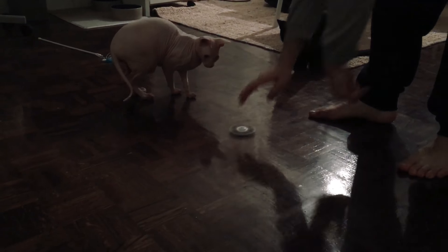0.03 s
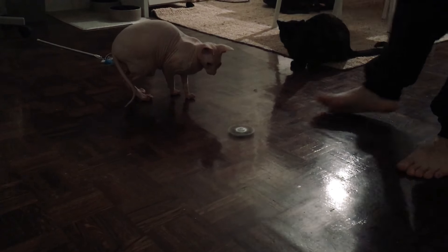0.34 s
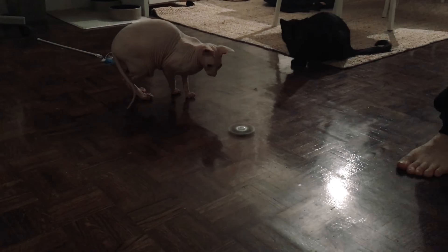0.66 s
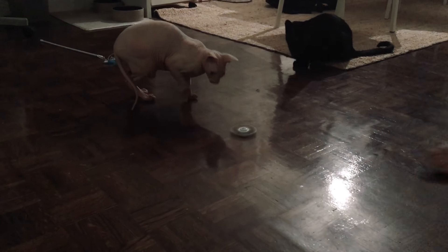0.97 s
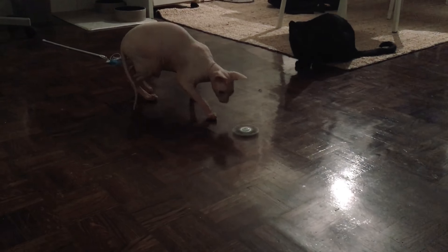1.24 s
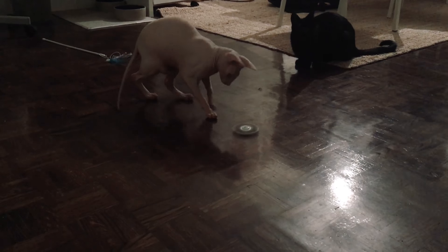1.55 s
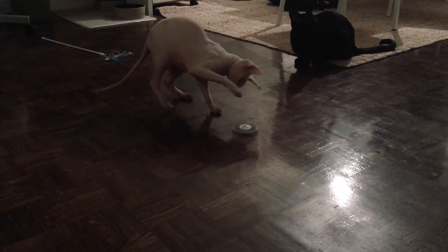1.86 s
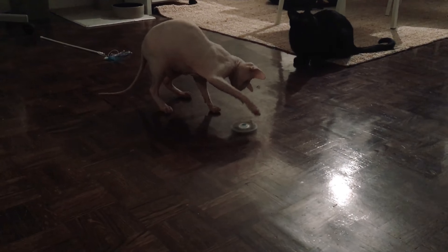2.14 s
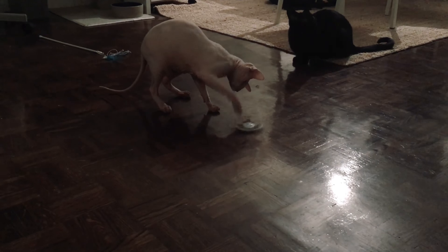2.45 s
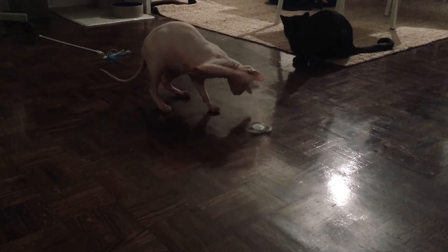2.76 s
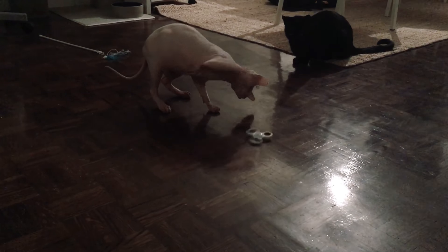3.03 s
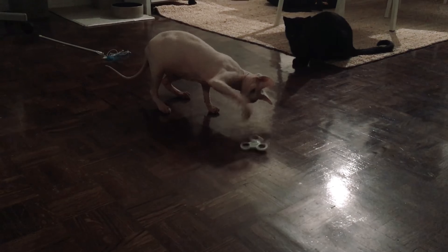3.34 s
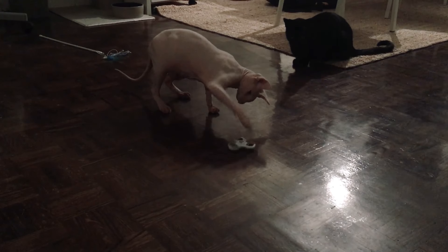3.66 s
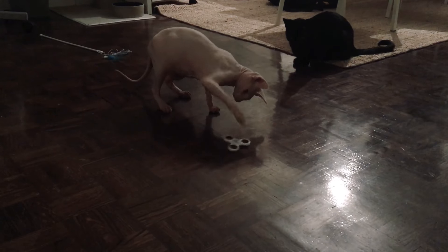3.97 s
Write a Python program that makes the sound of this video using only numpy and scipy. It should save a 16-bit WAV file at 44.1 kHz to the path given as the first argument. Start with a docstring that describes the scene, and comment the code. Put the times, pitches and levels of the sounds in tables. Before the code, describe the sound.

A toy spinner whirs faintly, then rattles and scrapes on wood as a cat bats it.

```python
"""A fidget spinner whirs on a parquet floor, balls ticking in its bearing, over a quiet room's mains hum.
The wood snaps and thuds a few times under shifting feet. A cat swishes a paw over the spinner
and slows it, then bats it about: the rim squeaks, the plastic frame chatters and scrapes over
the wood, and each knock sets the metal weights ringing faintly."""
import sys
import numpy as np
from scipy import signal
from scipy.fft import rfft, irfft
from scipy.io import wavfile

SR = 44100
rng = np.random.default_rng(int(sys.argv[2]) if len(sys.argv) > 2 else 0)


def put_to_file(sound):
    """Save the sound as 16-bit audio at rate SR, in the file named by the first command-line argument."""
    columns = np.atleast_2d(sound).T  # one column per channel
    safe = np.clip(columns, -1, 1)
    whole_steps = np.round(safe * 32767)
    wavfile.write(sys.argv[1], SR, whole_steps.astype(np.int16))


N = 176400
TIME = np.arange(N) / SR
CUTOFF_HZ = 15900


def from_db(db):
    """Decibels to gain."""
    return 10 ** (np.asarray(db) / 20)


def rms_one(x):
    """Scale to rms 1."""
    return x / np.sqrt(np.mean(x ** 2) + 1e-20)


def fader(curve):
    """Gain over time from (time [s], level [dB]) points."""
    return from_db(np.interp(TIME, *np.transpose(curve)))


def swell(s, half):
    """A bell-shaped rise and fall around time s."""
    return np.exp(-np.minimum(((TIME - s) / half) ** 2 / 2, 40))


def cut(x, hz, kind, order=2):
    """Low-, high- or band-pass, gentle by default."""
    return signal.sosfilt(signal.butter(order, hz, kind, fs=SR, output="sos"), x + 1e-18)


def colour(x, points):
    """Minimum-phase EQ from (frequency [Hz], level [dB]) points; white noise keeps its power."""
    hz, db = np.transpose(points)
    bins_hz = np.arange(N + 1) * SR / (2 * N)
    gain = rms_one(from_db(np.interp(np.log(bins_hz + 1), np.log(hz), db)))
    cepstrum = irfft(np.log(gain))
    cepstrum[1:N] *= 2
    cepstrum[N + 1:] = 0
    return irfft(rfft(x, 2 * N) * np.exp(rfft(cepstrum)))[:N]


def grains(per_s, spread_db):
    """Random tiny contacts of uneven size; rms 1."""
    sizes = from_db(spread_db * np.minimum(rng.exponential(1, N), 4)) * rng.choice([-1, 1], N)
    return rms_one(sizes * (rng.random(N) < per_s / SR))


def drift(hz):
    """A random wobble at rates up to about hz; rms 1."""
    return rms_one(cut(rng.standard_normal(2 * N), hz, "low")[N:])


def ring(x, hz, t60):
    """A mode: a unit click sets a sine of height 1 ringing."""
    r, w = np.exp(-np.log(1000) / (t60 * SR)), 2 * np.pi * hz / SR
    return signal.lfilter([0, np.sin(w)], [1, -2 * r * np.cos(w), r * r], x + 1e-18)


def resonance(x, hz, width):
    """A resonant band with gain 1 at its peak."""
    r, w = np.exp(-np.pi * width / SR), 2 * np.pi * hz / SR
    return signal.lfilter([1, 0, -1], [1, -2 * r * np.cos(w), r * r], x) * (1 - r * r) / 2


# Fader ride of the whole whir: (time [s], level [dB])
WHIR_RIDE = [(0, -61), (.3, -63), (1.6, -64), (2.46, -65.5), (2.52, -65), (2.8, -68), (3.0, -64)]
# Extra ride on its low resonances: (time [s], level [dB])
LOW_WHIR_RIDE = [(0, -5), (.3, -1), (1.2, 1.5), (2.47, 0), (2.5, -7.5)]
# Broad resonances, the body of the whir: (frequency [Hz], width [Hz], relative level [dB])
WHIR_BANDS = [(2060, 360, 1), (3520, 510, -8.5), (4420, 750, -6.5), (5440, 650, -4.5), (6650, 310, -7.5),
              (9390, 104, -6), (11850, 830, -6)]
# Narrow resonances that sing in it: (frequency [Hz], level against the whir [dB])
SINGING_TONES = [(2003, -14.5), (2143, -21), (2245, -20.5), (2336, -13), (2673, -19), (4535, -13),
                 (4686, -20.5), (5491, -18.5)]


def bearing(flutter_db=1.66, flutter_hz=28.2, tone_width_hz=13.3, low_below_hz=3000):
    """Balls tick densely in their race, exciting a fluttering whir and thin, wavering tones."""
    def excited(hz, width):
        ringing = rms_one(resonance(grains(per_s=5000, spread_db=2.0), hz, width))
        return ringing * (fader(LOW_WHIR_RIDE) if hz < low_below_hz else 1)
    whir = 0
    for hz, width, db in WHIR_BANDS:
        fluttering_gain = from_db(db + flutter_db * drift(flutter_hz))
        whir += fluttering_gain * np.sqrt(width) * excited(hz, width)
    tones = sum(from_db(db) * excited(hz, tone_width_hz) for hz, db in SINGING_TONES)
    return fader(WHIR_RIDE) * (rms_one(cut(whir, 1800, "high")) + tones)


# Hum of appliances: (frequency [Hz], rms level [dB])
HUM_TONES = [(59.2, -61.5), (118.4, -64), (182.6, -57), (236.9, -68.5), (549.1, -83.5), (609, -77.5),
             (913.5, -76.5)]
# EQ of the room's rumble and of the microphone's hiss: (frequency [Hz], relative level [dB])
RUMBLE_EQ = [(20, -35.5), (35, -10.5), (55, -0.5), (85, 1.5), (140, -7.5), (260, -9.5), (480, -22),
             (950, -25.5), (1300, -31.5), (8000, -58.5)]
HISS_EQ = [(800, -12), (2000, 3.5), (2900, 1), (4400, 18), (5300, -9), (6400, -18), (7600, -3), (8700, -27),
           (9350, 13), (10300, -28), (11300, 20.5), (12500, -22), (16000, -13)]


def background(waver_rad=0.11, rumble_db=-53, hiss_db=-73.5):
    """Appliances hum with a slight waver over a bed of room rumble and microphone hiss."""
    hum = 0
    for hz, db in HUM_TONES:
        phase = 2 * np.pi * (hz * TIME + rng.random()) + waver_rad * drift(hz=3.6)
        hum += from_db(db) * np.sqrt(2) * np.sin(phase)
    rumble, hiss = rng.standard_normal((2, N))
    return hum + from_db(rumble_db) * colour(rumble, RUMBLE_EQ) + from_db(hiss_db) * colour(hiss, HISS_EQ)


# Voice of the plastic frame, scraped or struck: (frequency [Hz], relative level [dB])
FRAME_EQ = [(300, -39), (900, -20.5), (1280, -14.5), (1750, -27.5), (2560, -11), (2950, -16.5), (4200, 4),
            (5100, -1.5), (6300, 8.5), (7700, -10.5), (9400, -1), (10400, -9.5), (11400, 0.5),
            (12500, -14.5), (13800, -14), (16000, -28)]
# Fader ride of the scrape, faint from the start, surging among the knocks: (time [s], level [dB])
SCRAPE_RIDE = [(2.79, -70), (2.88, -61), (2.93, -55.5), (2.98, -57.5), (3.02, -63), (3.15, -49),
               (3.22, -59), (3.33, -55), (3.41, -54), (3.48, -86), (3.53, -52.5), (3.66, -51.5),
               (3.73, -55), (3.8, -74), (3.91, -86), (3.94, -53), (4.0, -78)]


def scrape():
    """The frame slides over grit in a stream of tiny contacts."""
    return fader(SCRAPE_RIDE) * colour(grains(per_s=2200, spread_db=4.5), FRAME_EQ)


# Parquet snaps, levels ahead of the band filters: (time [s], wood level [dB], crack level [dB])
FLOOR_SNAPS = [(.3835, -21.5, -36), (0.4279, -24, -25.5), (0.8761, -21, -45), (.9418, -26.5, -29.5),
               (2.496, -35, -31)]


def floor_ticks(wood_hz=(1160, 3320), crack_hz=(6000, 14000), reverb_send=0.55):
    """Each tick of the parquet is one snap: a woody click with a thin crack on top."""
    times, wood_db, crack_db = np.transpose(FLOOR_SNAPS)
    ticks = 0
    for db, edges in ((wood_db, wood_hz), (crack_db, crack_hz)):
        snaps = np.zeros(N)
        snaps[(times * SR).astype(int)] = from_db(db)
        ticks += cut(snaps, edges, "band", order=3)
    return ticks + reverb_send * reverb(ticks)


# Soft thuds of feet and paws: (time [s], level [dB], pitch [Hz])
THUDS = [(0.518, -47, 63), (3.298, -37, 79.4), (3.437, -40.5, 67), (3.954, -56, 379)]


def footfalls(rise_s=0.0083):
    """Soft steps give the floor a few slow swings."""
    out = 0
    for s, db, hz in THUDS:
        age = np.maximum(TIME - s, 0)
        envelope = age / rise_s * np.exp(1 - age / rise_s)
        out += from_db(db) * envelope * np.sin(2 * np.pi * hz * age)
    return out


# Paws brushing past: (time [s], half length [s], level [dB])
PAW_STROKES = [(1.034, 0.018, -68), (1.276, 0.063, -63), (2.475, 0.0055, -55), (2.508, .016, -60.5),
               (2.574, 0.036, -64.5), (2.768, 0.015, -65.5)]
# EQ of their rub: (frequency [Hz], relative level [dB])
PAW_EQ = [(1000, -6), (3000, 1), (6500, 7.5), (9800, -1), (12500, -1), (16000, -4.5)]


def paw_swishes(centre_hz=7700, sweep_octaves=0.4, band_db=-4.5):
    """Paws rub over floor and rim; a noise band in each swish rises as the stroke speeds up."""
    rub = colour(grains(per_s=2200, spread_db=4.0), PAW_EQ)
    band_noise = from_db(band_db) * drift(hz=780)
    out = 0
    for s, half, db in PAW_STROKES:
        hz = centre_hz * 2 ** (sweep_octaves * np.tanh((TIME - s) / half))
        rising_band = band_noise * np.sin(2 * np.pi * np.cumsum(hz) / SR)
        out += from_db(db) * swell(s, half) * (rub + rising_band)
    return out


# Chirps of the dragging rim: (time [s], half length [s], pitch [Hz], level [dB])
RIM_SQUEAKS = [(1.255, 0.014, 3750, -70), (2.76, .005, 9000, -62), (3.092, 0.0055, 5700, -42),
               (3.332, 0.0018, 11200, -44), (3.533, 0.0013, 11400, -49), (3.542, 0.0015, 11300, -33),
               (3.5555, 0.0014, 11600, -43), (3.652, 0.02, 4230, -48), (3.937, 0.0012, 11400, -44)]


def squeaks(rough_rad=0.8, rough_hz=270):
    """The rim sticks and slips, singing in short rough tones."""
    out = 0
    for s, half, hz, db in RIM_SQUEAKS:
        phase = 2 * np.pi * hz * TIME + rough_rad * drift(rough_hz)
        out += from_db(db) * swell(s, half) * np.sqrt(2) * np.sin(phase)
    return out


# The spinner hits the floor, levels ahead of the trim:
# (time [s], body level [dB], middle level [dB], treble level [dB])
FRAME_HITS = [(2.813, -57.5, -52, -61), (2.85, -73, -57, -61), (2.855, -65, -54, -56),
              (2.9052, -63, -58, -59), (2.932, -70, -52.5, -59), (2.9404, -57.5, -59, -55),
              (3.0015, -72, -46, -49), (3.009, -55, -39, -39), (3.0151, -49, -39.5, -48),
              (3.0386, -74, -40.5, -42.5), (3.062, -57, -42.5, -43), (3.076, -63, -45, -45),
              (3.0884, -63, -35.5, -49), (3.091, -55, -41, -44), (3.1133, -54, -35, -42.5),
              (3.1375, -54.5, -40.5, -39.5), (3.1756, -55, -39.5, -56), (3.1806, -68, -50, -45),
              (3.1912, -77, -48, -55), (3.2819, -50, -51, -60), (3.286, -58, -61, -42.5),
              (3.3025, -66, -39, -52), (3.345, -56, -39.5, -44.5), (3.403, -58, -41.5, -45.5),
              (3.4198, -79, -43, -53), (3.5083, -75, -54, -58), (3.5229, -52, -41.5, -48),
              (3.542, -68, -38.5, -40), (3.567, -59, -55, -51), (3.5797, -45, -35, -38.5),
              (3.6216, -51, -40, -44.5), (3.6423, -74, -36.5, -40), (3.6651, -47, -38.5, -42),
              (3.6905, -71, -37.5, -42.5), (3.7032, -57, -53, -62), (3.7337, -74, -41, -59),
              (3.8474, -62.5, -52, -61), (3.855, -69, -52.5, -57), (3.9306, -58, -48.5, -53),
              (3.944, -68, -59.5, -56), (3.9463, -71, -47, -47)]


def knocks(trim_db=-9.5, rise_s=0.00089, fall_s=0.0015, spot_gain=1.8, spot_width_hz=1260):
    """Each knock is a brief flurry of contacts on the frame; the spot hit favours a pitch per band."""
    contacts = colour(grains(per_s=13000, spread_db=2.5), FRAME_EQ)
    ranges_hz = [(900, 3205), (3205, 8700), (8700, CUTOFF_HZ)]
    bands = [cut(contacts, edges, "band", order=4) for edges in ranges_hz]
    offsets = np.arange(-SR // 100, SR // 50)
    envelope = np.exp(np.minimum(offsets / SR / rise_s, -offsets / SR / fall_s))
    out = np.zeros(N)
    for s, *levels in FRAME_HITS:
        span = int(s * SR) + offsets
        for band, (low, high), db in zip(bands, ranges_hz, levels):
            flurry = band[span] * envelope
            spot = resonance(flurry, rng.uniform(low, high), spot_width_hz)
            out[span] += from_db(trim_db + db) * rms_one(flurry + spot_gain * spot)
    return out


# Modes of the weights and bearing: (frequency [Hz], level against the hit's middle [dB], t60 [s])
METAL_MODES = [(1325, -25, 0.058), (4070, -46, 0.41), (4050, -41, 0.55), (4288, -46, .45),
               (5830, -35, 0.52), (6240, -30, 0.45), (6500, -22, 0.49), (11330, -42, 0.15)]


def weights():
    """Every knock sets the metal weights ringing faintly."""
    times, _, middle_db, _ = np.transpose(FRAME_HITS)
    out = 0
    for hz, mode_db, t60 in METAL_MODES:
        blows = np.zeros(N)
        blows[(times * SR).astype(int)] = from_db(middle_db + mode_db) * rng.choice([-1, 1], len(times))
        out += ring(blows, hz, t60)
    return out


def reverb(x, wet_db=-4, low_t60_s=0.29, treble_t60_s=0.2, crossover_hz=4700, treble_db=-8):
    """The room's reflections alone: a short diffuse tail whose treble dies sooner."""
    t = TIME[:SR]
    low, high = rng.standard_normal((2, SR)) * (1 - np.exp(-t / 0.0015))
    low = cut(cut(low, crossover_hz, "low"), crossover_hz, "low") * from_db(-60 * t / low_t60_s)
    high = cut(high, crossover_hz, "high") * from_db(treble_db - 60 * t / treble_t60_s)
    response = from_db(wet_db) * rms_one(low + high) / np.sqrt(SR)
    return signal.fftconvolve(x, response)[:N]


def scene():
    """The mono mix: the cat's play with its reverb, plus floor, whir and background."""
    play = scrape() + knocks() + weights() + squeaks() + paw_swishes()
    return (play + reverb(play) + floor_ticks() + bearing() + footfalls() + background())[None]


def record(dry):
    """A steep low-pass takes the very top off the mix."""
    return signal.sosfilt(signal.ellip(12, .1, 80, CUTOFF_HZ, fs=SR, output="sos"), dry)


dry = scene()
out = record(dry)
put_to_file(out)
```